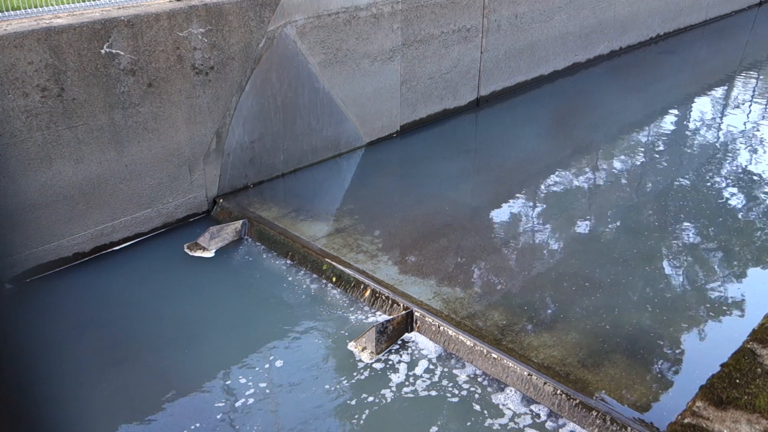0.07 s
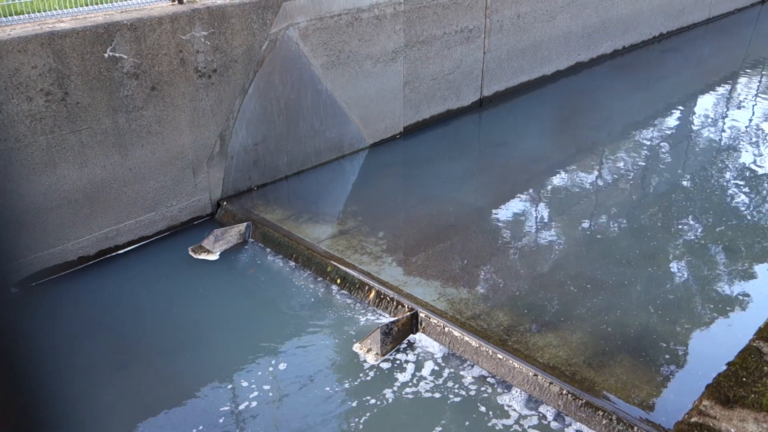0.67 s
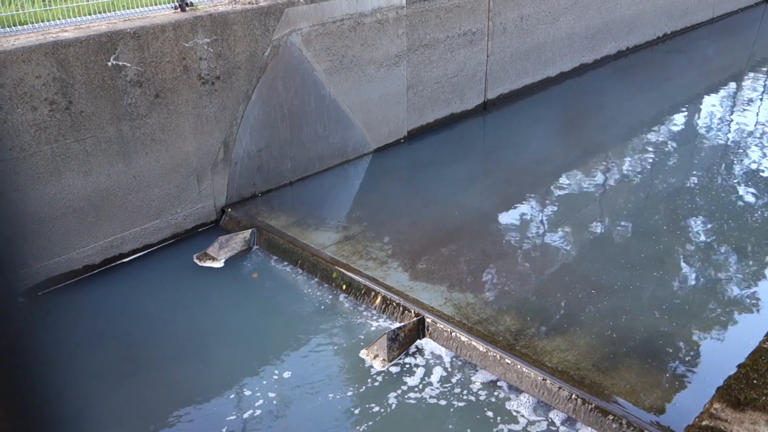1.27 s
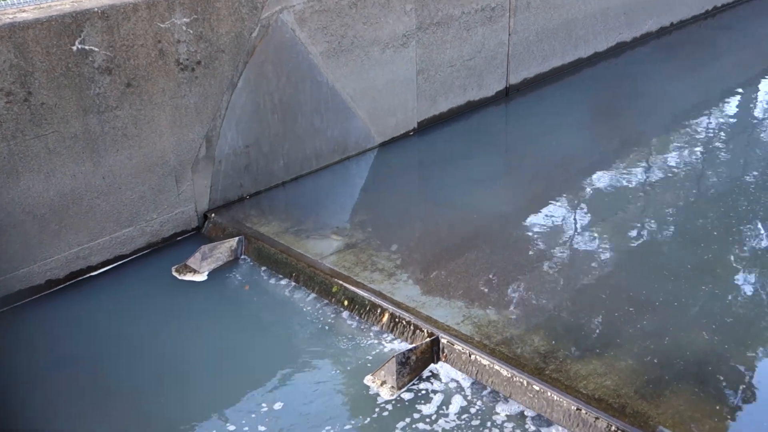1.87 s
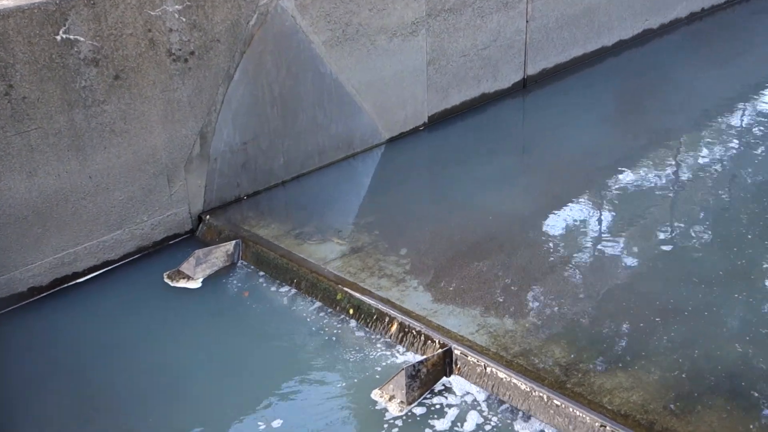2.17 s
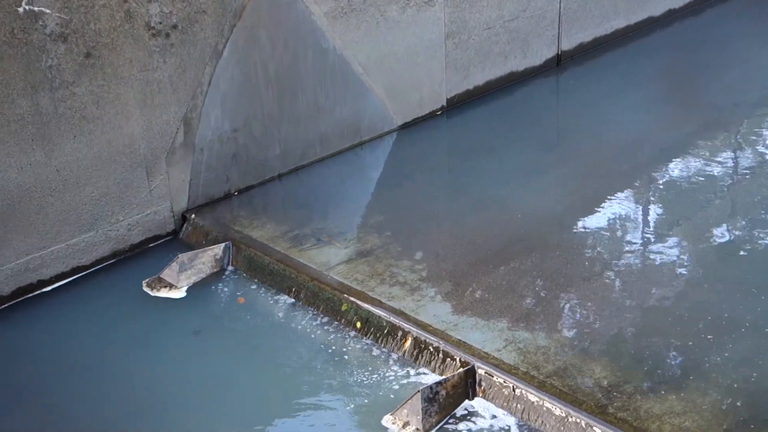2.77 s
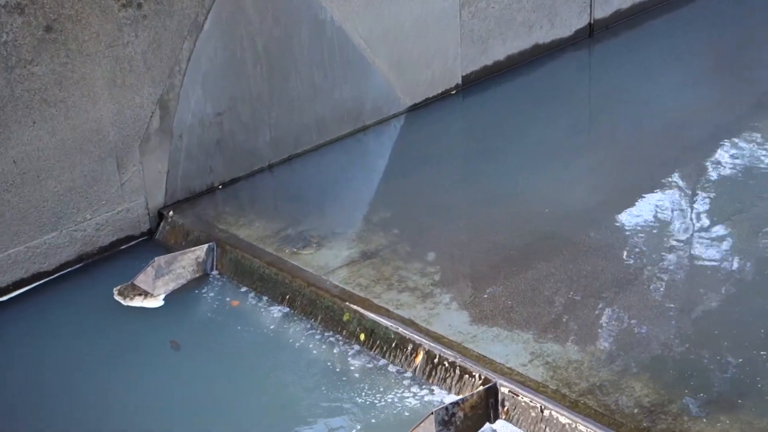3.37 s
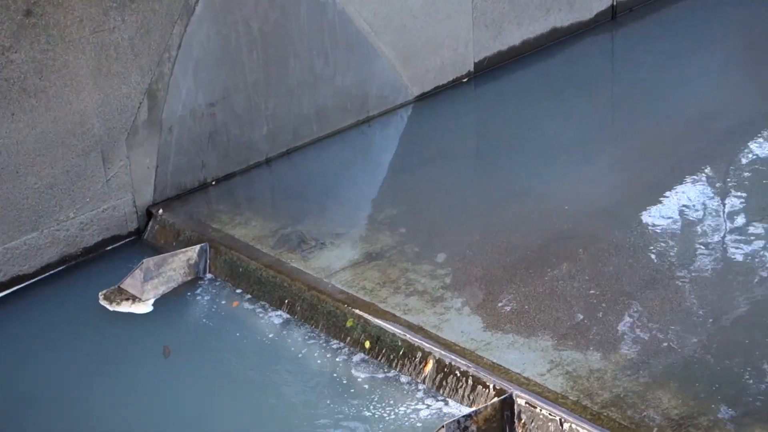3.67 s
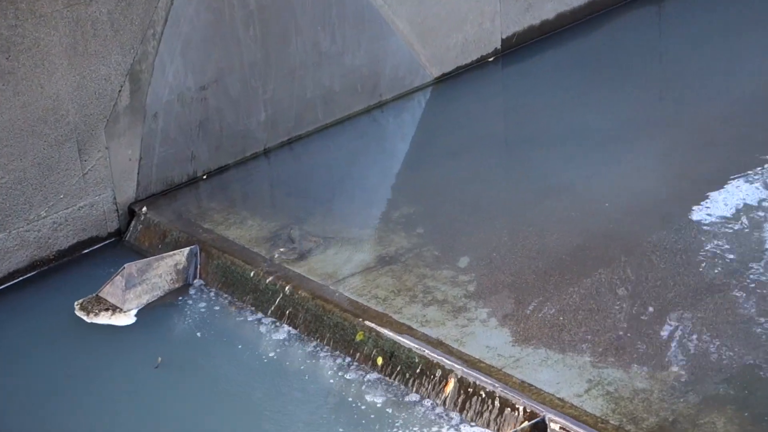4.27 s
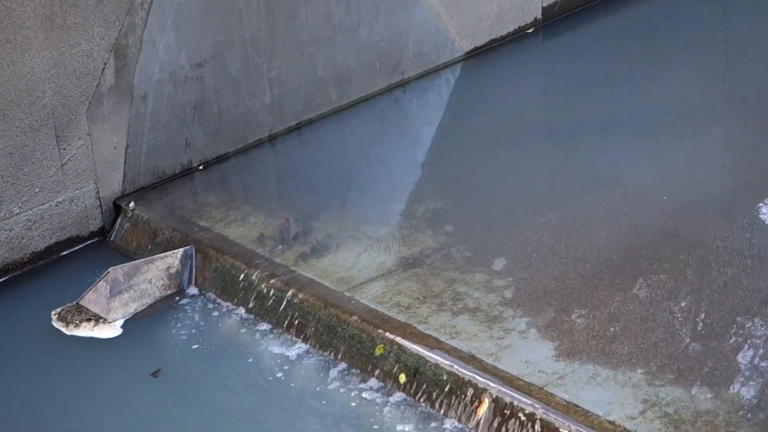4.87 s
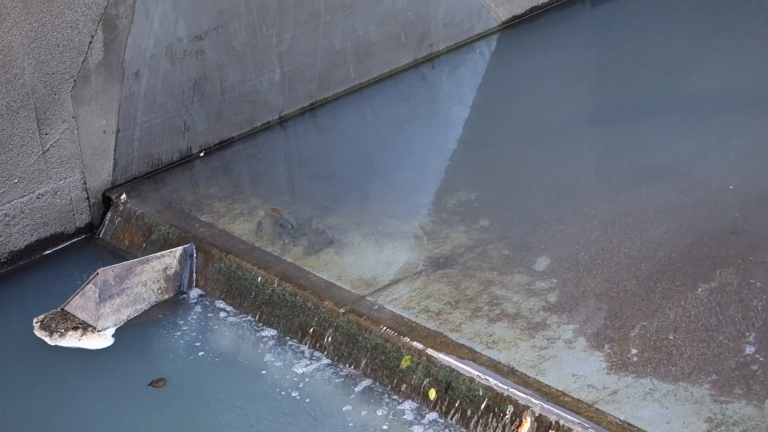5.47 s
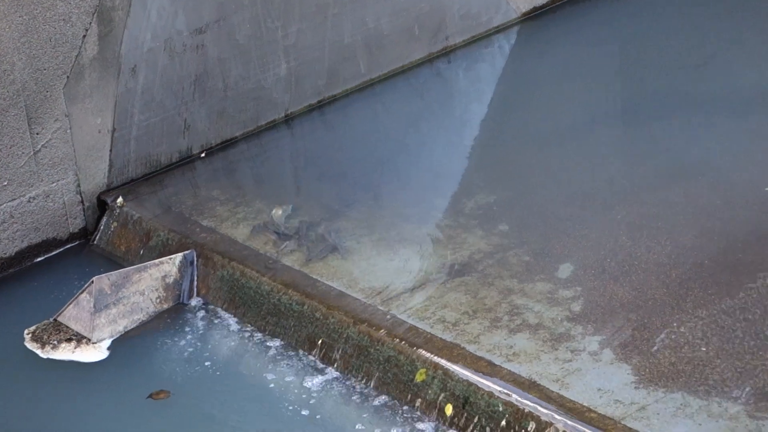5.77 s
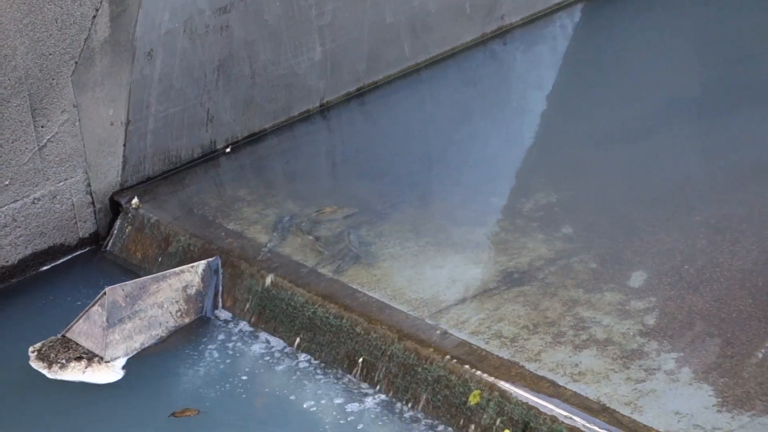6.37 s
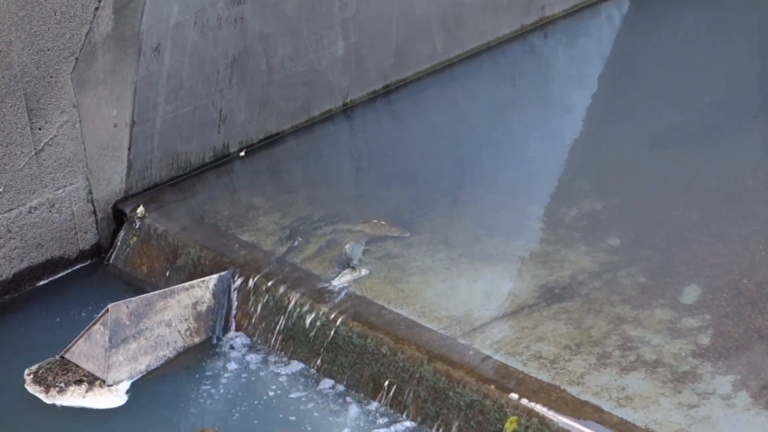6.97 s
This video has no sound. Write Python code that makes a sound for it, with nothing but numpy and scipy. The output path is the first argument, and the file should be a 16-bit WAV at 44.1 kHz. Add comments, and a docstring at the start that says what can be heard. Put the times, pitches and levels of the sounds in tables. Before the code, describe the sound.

A camera's zoom motor whirrs close by with a bright, throbbing whine, over the soft rush of water spilling over a low step.

```python
"""A camera's zoom motor whirrs beside the microphone, bright and throbbing: it steps a lead screw round,
and the periodic drive excites friction noise, a harmonic series and resonances of the lens barrel.
Its focus motor hums slowly upward. Some metres off, water spills steadily over a low concrete step
in a canal, a soft rush with ringing bubbles. A few low bumps of air reach the microphone's two ports.
The sound fades in at the start."""
import sys
import numpy as np
from scipy import signal
from scipy.fft import rfft, irfft, next_fast_len
from scipy.io import wavfile

SR = 44100
rng = np.random.default_rng(int(sys.argv[2]) if len(sys.argv) > 2 else 0)


def materialize(psi):
    """Save the field psi as 16-bit PCM at rate SR to the path in sys.argv[1].

    A 1-D psi becomes a single channel; in a 2-D psi each row is a channel.
    """
    bounded = np.clip(np.atleast_2d(psi).T, -1, 1)
    quanta = np.round(bounded * 32767).astype(np.int16)
    wavfile.write(sys.argv[1], SR, quanta)


N = 313992
TIME = np.arange(N) / SR

# Spectrum of the falling water: frequency_hz, relative_density_db
WATER_SPECTRUM = [(22, -11.5), (60, -5), (125, -6.5), (175, 2.5), (220, -2.5), (310, -4), (430, -12),
                  (570, -6), (850, -17), (1200, -15), (1600, -19.5), (2500, -16.5), (3900, -19),
                  (7000, -17), (11000, -25)]
# Likeness of the water's sound at the two ports: frequency_hz, correlation
WATER_CORRELATION = [(100, .95), (250, .935), (500, .93), (1400, .7), (2400, .8), (4000, .58), (9000, .2)]
# Stereo balance of the water: frequency_hz, left_minus_right_db
WATER_BALANCE = [(150, 1), (600, 1.1), (1400, 2.5), (2500, 0), (3600, 0.5), (6000, 3.5)]
# Large single bubbles: start_s, pitch_hz, peak_db, t60_s
LARGE_BUBBLES = [(2.12, 513, -34, 0.088), (5.014, 1670, -37, 0.022), (5.073, 1260, -36, 0.036),
                 (5.083, 1250, -32, 0.043), (5.52, 473, -37, 0.12)]
# Puffs of air at the ports: start_s, relative_level_db
AIR_PUFFS = [(2.439, -39), (4.289, -32), (5.254, -30), (5.281, -33), (5.809, -35), (5.918, -31),
             (6.009, -29.5), (6.049, -29), (6.15, -31.5), (6.348, -29.5), (6.399, -32.5)]
# Rising tone of the focus motor: time_s, pitch_hz
FOCUS_GLIDE = [(.2, 194), (.65, 220), (1.25, 231.5), (3.25, 240.5), (4.3, 250.5), (7.12, 252)]
# Steady tones of the zoom motor in the camera body: pitch_hz, level_db
BODY_TONES = [(262.5, -47.0), (524, -52.5), (1049, -61)]
# Spectrum of the friction in the drive: frequency_hz, relative_density_db
FRICTION_SPECTRUM = [(4000, -27), (4600, -13), (5000, -2.5), (5400, 3), (5800, 4), (6400, 2.5), (7000, 2),
                     (7600, 0), (8200, -6), (9000, -7.5), (9800, -11), (10400, -3), (10900, -5.5)]
# Likeness of the friction at the two ports: frequency_hz, correlation
FRICTION_CORRELATION = [(4500, 0.37), (5000, 0.29), (5400, 0.23), (5800, 0.04), (6200, 0.13), (6600, 0.12),
                        (7000, 0.01), (7400, -0.29), (7800, -0.21), (8300, -0.34), (8900, -0.37),
                        (9600, -0.34), (10700, -0.41)]
# How the barrel shares the friction between the ports: frequency_hz, left_minus_right_db
FRICTION_BALANCE = [(4500, 0.0), (5000, -2.0), (5400, -1.0), (5800, 3.0), (6200, 5.5), (6600, 7.5),
                    (7000, 6.0), (7400, 2.5), (7800, 1.5), (8300, 2.5), (8900, -0.5), (9600, 0.5),
                    (10700, 3.5)]
# Harmonics of the drive: step_rate_multiple, relative_level_db, left_minus_right_db, left_lead_rad
DRIVE_HARMONICS = [(14, -57.5, -1, -0.2), (22, -60, -3, -0.2), (24, -59, -1, -1.7), (26, -49, 0, -0.0),
                   (28, -45, -5, -1.0), (30, -44, 5, -1.6), (33, -43, 10, -2.2), (34, -46, 7, -1.8),
                   (35, -45, 9, -2.4), (36, -46, 3, -1.7), (37, -43.5, 3, -2.3), (38, -51, 4, -2.5),
                   (39, -46.5, -1, -2.4), (40, -52, 1, -2.2), (41, -51, 2, -2.0), (42, -51, 4, -3.1),
                   (51, -57, 2, -2.7), (53, -54, 4, -1.6), (54, -55, 6, 2.7), (55, -49, 3, 2.5)]
# Harmonics that ring in the barrel and change when the bearing shifts: step_rate_multiple (rounded
# for pitch), base_level_db, shift_db, shift_length_s, left_minus_right_db, left_lead_rad
BARREL_HARMONICS = [(24.7, -52.5, 6, .8, -6, 0.8), (27, -44, 9.5, 0.21, -4, 0.9), (29, -42.5, 8, 1.0, 3, 1),
                    (31, -43.5, -8, .3, 10, -2)]
# Resonant spots along the lens's travel: centre_s, step_rate_multiple, rise_db, half_length_s
RESONANT_SPOTS = [(.5, 27, 3.0, .5), (2.3, 29, 3.5, .2), (3.0, 14, 3.5, .8), (3.3, 31, 4.5, .25),
                  (5.75, 29, 2.5, .3), (7.1, 27, 3.0, .2)]

STEP_HZ, TURN_HZ = 197.45, 16.13  # motor steps and screw turns per second
BEARING_SHIFT_S = 4.78  # the lens shifts its bearing: brighter friction, a different ring
LEFT_RIGHT = np.array([[1], [-1]])


def from_db(db):
    """Amplitude ratio of a level in decibels."""
    return 10 ** (np.asarray(db) / 20)


def unit_rms(x):
    """Normalisation to an rms of 1."""
    return x / np.sqrt(np.mean(x ** 2) + 1e-20)


def at_hz(points, hz):
    """Interpolation of a table on a logarithmic frequency axis."""
    table_hz, value = np.transpose(points)
    return np.interp(np.log(hz + 1e-3), np.log(table_hz), value)


def ramp(start_s, length_s):
    """Linear rise from 0 to 1, then held."""
    return np.clip((TIME - start_s) / length_s, 0, 1)


def decay(start_s, decay_s):
    """Exponential decay after a hold at 1."""
    return np.exp(-np.maximum(TIME - start_s, 0) / decay_s)


def drift(rate_hz):
    """Low-passed noise: a smooth random fluctuation of rms 1."""
    hop, settling = 40, 2000
    pole = np.exp(-2 * np.pi * rate_hz * hop / SR)
    noise = rng.standard_normal(N // hop + settling + 2)
    slow = signal.lfilter([1], [1, -2 * pole, pole * pole], noise)[settling:]
    return np.interp(np.arange(N) / hop, np.arange(len(slow)), unit_rms(slow))


def resonator(clicks, hz, t60_s):
    """Damped oscillator: a unit impulse starts a decaying sine of height 1."""
    radius, angle = np.exp(-np.log(1000) / (t60_s * SR)), 2 * np.pi * hz / SR
    return signal.lfilter([0, np.sin(angle)], [1, -2 * radius * np.cos(angle), radius ** 2], clicks + 1e-18)


def to_ports(pair, spectrum, correlation, balance):
    """Partial coherence: sum and difference of two independent signals make left and right; rms 1."""
    size = next_fast_len(N)
    hz = np.arange(size // 2 + 1) * SR / size
    mid, side = rfft(pair, size)
    alike = at_hz(correlation, hz)
    ports = np.sqrt(1 + alike) * mid + LEFT_RIGHT * np.sqrt(1 - alike) * side
    colour = from_db(at_hz(spectrum, hz) + LEFT_RIGHT * at_hz(balance, hz) / 2)
    return unit_rms(irfft(ports * colour, size)[:, :N])


def air_bumps(gain_db=-3.5, rise_s=0.0093):
    """Pressure pulses: short puffs of air push on both ports in phase."""
    envelope = 0
    for start_s, db in AIR_PUFFS:
        age = np.maximum(TIME - start_s, 0) / rise_s
        envelope += from_db(db) * age * np.exp(1 - age)
    low_band = signal.butter(2, [65, 230], "band", fs=SR, output="sos")
    return from_db(gain_db) * envelope * unit_rms(signal.sosfilt(low_band, rng.standard_normal(N)))


def bubble_cloud(per_s=2200, low_hz=294.8, high_hz=4305, t60_cycles=23, spread_db=2.5, pitches=24):
    """Bubble resonance: each bubble, born at random, rings at a pitch set by its size; rms 1."""
    births = np.flatnonzero(rng.random(N) < per_s / SR)
    strength = from_db(spread_db * np.minimum(rng.exponential(1, N), 4)) * rng.choice([-1, 1], N)
    pitch_index, cloud = rng.integers(0, pitches, N), np.zeros(N)
    for k, hz in enumerate(np.geomspace(low_hz, high_hz, pitches)):
        clicks, starts = np.zeros(N), births[pitch_index[births] == k]
        clicks[starts] = strength[starts]
        cloud += hz * resonator(clicks, hz, t60_cycles / hz)
    return unit_rms(cloud)


def weir(level_db=-38, cloud_gain_db=-11.5, surge_db=.5):
    """Incoherent summation: bubbles churned by the falling sheet merge into a rush; some stand out."""
    cloud = np.array([bubble_cloud(), bubble_cloud()])
    churn = rng.standard_normal((2, N)) + from_db(cloud_gain_db) * cloud
    level = from_db(level_db + surge_db * drift(21))
    return level * to_ports(churn, WATER_SPECTRUM, WATER_CORRELATION, WATER_BALANCE)


def plops(chirp_per_s=0.21):
    """Damped oscillation: a large bubble rings, rising a little in pitch as it nears the surface."""
    out = 0
    for start_s, hz, db, t60_s in LARGE_BUBBLES:
        age_s = np.maximum(TIME - start_s, 0)
        envelope = from_db(db) * np.exp(-np.log(1000) * age_s / t60_s)
        out += envelope * np.sin(2 * np.pi * hz * age_s * (1 + chirp_per_s * age_s))
    return out


def motor_tone(hz, db, waver_db, wander_rad):
    """A sinusoid with slight random modulation of amplitude and phase."""
    phase = 2 * np.pi * np.cumsum(hz * np.ones(N)) / SR + wander_rad * drift(4.1)
    return np.sqrt(2) * from_db(db + waver_db * drift(18)) * np.sin(phase)


def focus_motor(idle_db=-53, work_db=10):
    """Pitch follows speed: the hum climbs, swells while the motor works hard, then drops back."""
    effort = ramp(0.82, .42) * decay(3.3, 2.3)
    pitch_hz = np.interp(TIME, *np.transpose(FOCUS_GLIDE))
    return motor_tone(pitch_hz, idle_db + work_db * effort, waver_db=0.8, wander_rad=0.068)


def body_hum():
    """Forced vibration: the zoom motor drives steady tones in the body; the lowest beats with the focus."""
    return sum(motor_tone(hz, db, waver_db=2.5, wander_rad=0.68) for hz, db in BODY_TONES)


def throb(hz, slip_turns=.035, dip=.35, sweep_hz_per_turn=5100):
    """Periodic loading: the screw binds for most of a turn and briefly comes free; higher bands lag."""
    lag_turns = -0.31 + (hz - 5240) / sweep_hz_per_turn
    angle = 2 * np.pi * (TURN_HZ * TIME - lag_turns + slip_turns * drift(1.4))
    return np.cos(angle) - dip * np.cos(2 * angle)


def throb_bands(rest, depth_db, bands=6):
    """Amplitude modulation: each frequency band swells at its own angle of the screw."""
    out, edges_hz = 0, np.geomspace(4700, 11000, bands + 1)
    for low, high in zip(edges_hz, edges_hz[1:]):
        lowpass = signal.butter(8, high, fs=SR, output="sos")
        band = rest if high == edges_hz[-1] else signal.sosfiltfilt(lowpass, rest)
        out += band * from_db(depth_db * throb(np.sqrt(low * high)))
        rest = rest - band
    return out


def screw_roughness(memory=0.53):
    """Quasi-periodic noise: each turn rubs nearly the same surface, so the friction partly repeats."""
    surface, turn = rng.standard_normal((2, N)), round(SR / TURN_HZ)
    for i in range(turn, N, turn):
        surface[:, i:i + turn] += memory * surface[:, i - turn:i][:, :N - i]
    return surface


def friction(steps, uneven_db=3.5, decay_steps=0.39):
    """Sliding friction: every half step jerks the drive into a brief burst above the steady rub."""
    half_step = (2 * steps).astype(int)
    strength = from_db(uneven_db * rng.standard_normal(N))[half_step]
    envelope = 1 + strength * np.exp(-(steps - half_step / 2) / decay_steps)
    scrape = to_ports(envelope * screw_roughness(), FRICTION_SPECTRUM, FRICTION_CORRELATION,
                      FRICTION_BALANCE)
    treble = signal.sosfiltfilt(signal.butter(4, [8200, 10200], "band", fs=SR, output="sos"), scrape)
    # The treble dulls as the lens travels and jumps when the bearing shifts.
    treble_db = 4.635 - 1.092 * TIME + 7.725 * ramp(BEARING_SHIFT_S, 0.21)
    return throb_bands(scrape + (from_db(treble_db) - 1) * treble, depth_db=0.15)


def flare_db(multiple):
    """Resonance: a harmonic swells as the lens passes a spot that favours it."""
    return sum(rise_db * np.exp(-((TIME - centre_s) / half_s) ** 2)
               for centre_s, k, rise_db, half_s in RESONANT_SPOTS if k == round(multiple))


def harmonic(steps, multiple, balance_db, lead_rad, waver_db, wander_rad, flutter_db=1.5):
    """A whole multiple of the step rate reaches the ports with a level gap and a drifting phase gap."""
    phase = 2 * np.pi * ((round(multiple) * steps + rng.random()) % 1) + wander_rad * drift(6.1)
    gap_rad = lead_rad + 1.2 * wander_rad * drift(2.57)
    level = from_db(waver_db * drift(0.85) + flutter_db * drift(22))
    pan = unit_rms(from_db(LEFT_RIGHT * balance_db / 2))
    return np.sqrt(2) * level * pan * np.sin(phase + LEFT_RIGHT * gap_rad / 2)


def drive_whine(steps, strain_db, gain_db=-1, throb_db=4.5, strain_above_hz=4000):
    """Periodic stepping force gives a harmonic series; only its upper members follow the load."""
    out = 0
    for multiple, db, balance_db, lead_rad in DRIVE_HARMONICS:
        hz = multiple * STEP_HZ
        swell_db = strain_db * (hz > strain_above_hz) + flare_db(multiple) + throb_db * throb(hz)
        tone = harmonic(steps, multiple, balance_db, lead_rad, waver_db=1.77, wander_rad=0.94)
        out += from_db(gain_db + db + swell_db) * tone
    return out


def barrel_ring(steps, strain_db, throb_db=3):
    """Forced resonance: a few harmonics ring in the barrel and change level as the bearing shifts."""
    out = 0
    for multiple, db, shift_db, shift_length_s, balance_db, lead_rad in BARREL_HARMONICS:
        bearing_db = shift_db * ramp(BEARING_SHIFT_S, shift_length_s)
        swell_db = strain_db + flare_db(multiple) + throb_db * throb(multiple * STEP_HZ)
        tone = harmonic(steps, multiple, balance_db, lead_rad, waver_db=0.7, wander_rad=0.48)
        out += from_db(db + bearing_db + swell_db) * tone
    return out


def drive_strain_db(stiff_db=3, easing_db_per_s=0.46, end_db=3.5):
    """Level follows load: the drive starts stiff, frees itself, eases, then strains near its end stop."""
    stiffness = 1 - ramp(0.66, 0.43)
    return 0.5 + stiff_db * stiffness - easing_db_per_s * TIME + end_db * ramp(6.74, .4)


def zoom_motor(slowing_hz=.65, jitter_hz=0.152, friction_gain_db=-29.84):
    """Periodic excitation: a stepping motor turns a screw; one step rate times scrape, whine and ring."""
    slow_stretch = ramp(1.2, 0.346) - ramp(3.4, 0.346)
    rate_hz = STEP_HZ - slowing_hz * slow_stretch + jitter_hz * drift(19.9)
    steps = np.cumsum(rate_hz) / SR
    strain_db = drive_strain_db()
    scrape = from_db(friction_gain_db + strain_db) * friction(steps)
    return scrape + drive_whine(steps, strain_db) + barrel_ring(steps, strain_db)


def scene():
    """Superposition of the distant water and of the air and motors at the microphone."""
    return weir() + plops() + air_bumps() + zoom_motor() + focus_motor() + body_hum()


def record(dry, cutoff_hz=11050):
    """Band limiting: the input fades in and a steep low-pass filter removes the top."""
    faded = dry * (1 - decay(0.044, .08))
    return signal.sosfilt(signal.ellip(14, .1, 90, cutoff_hz, fs=SR, output="sos"), faded)


dry = scene()
out = record(dry)
materialize(out)
```